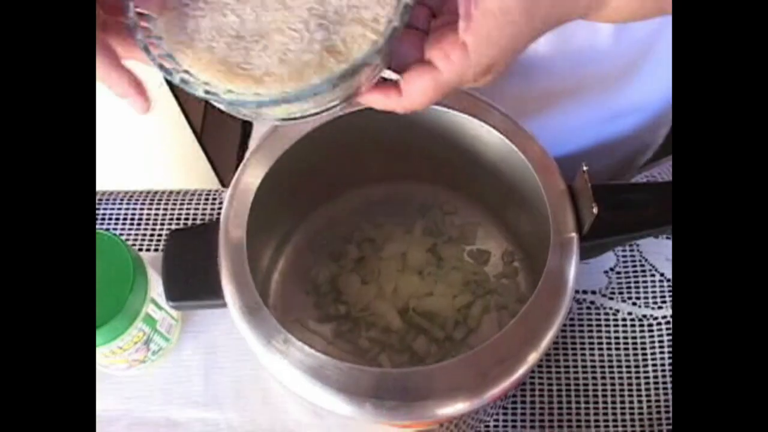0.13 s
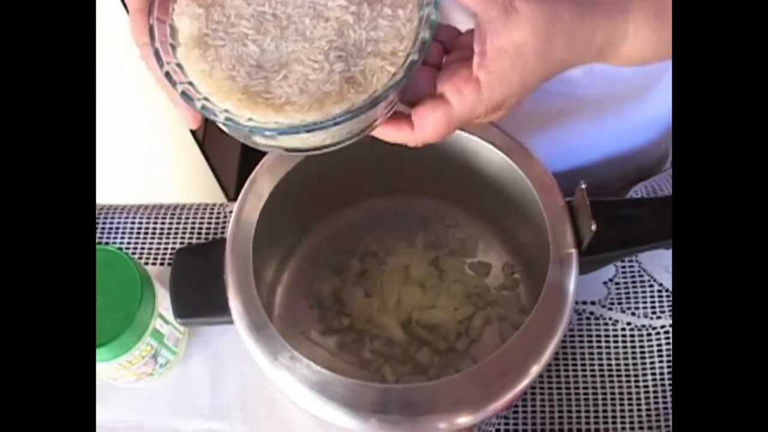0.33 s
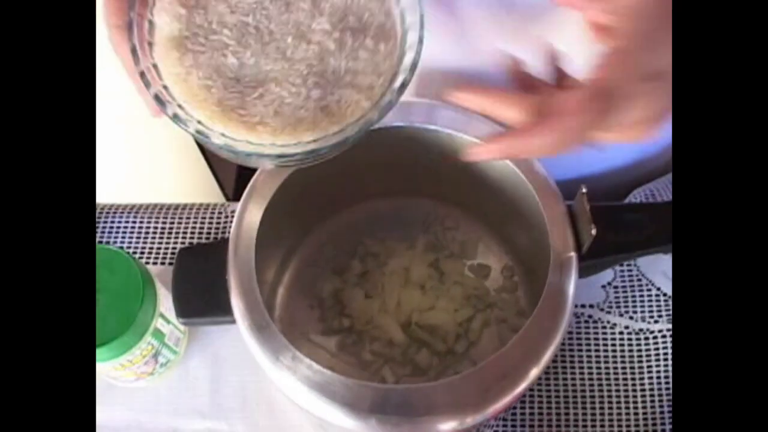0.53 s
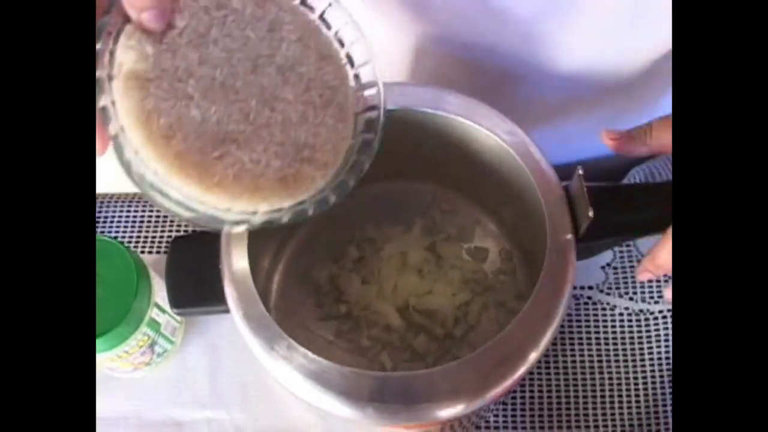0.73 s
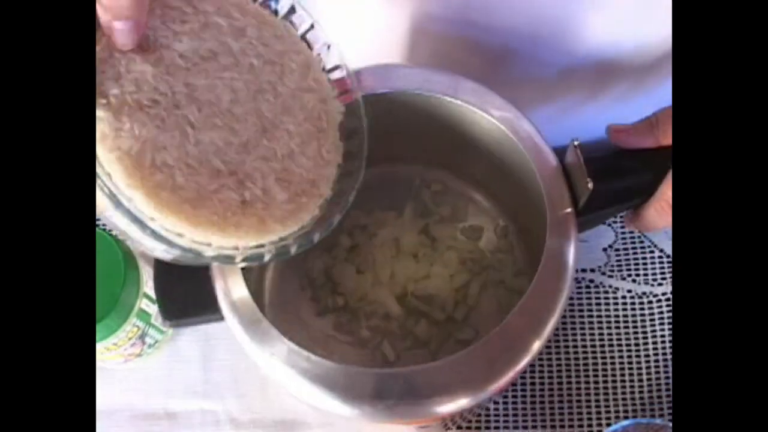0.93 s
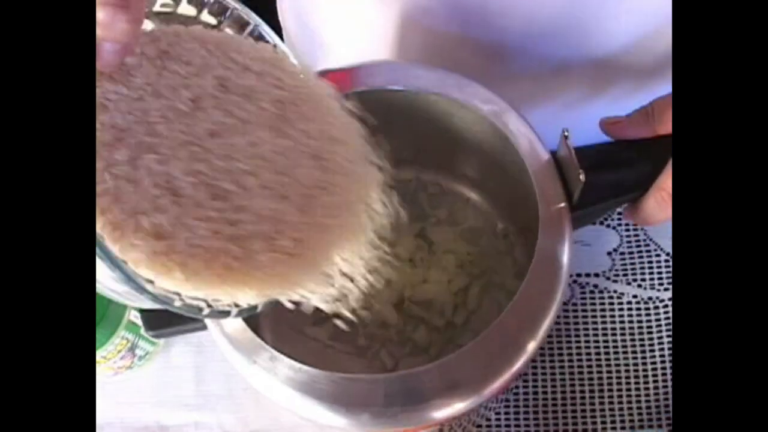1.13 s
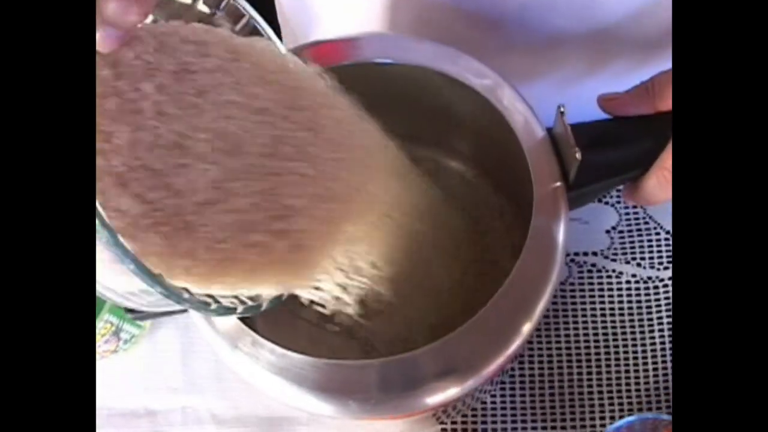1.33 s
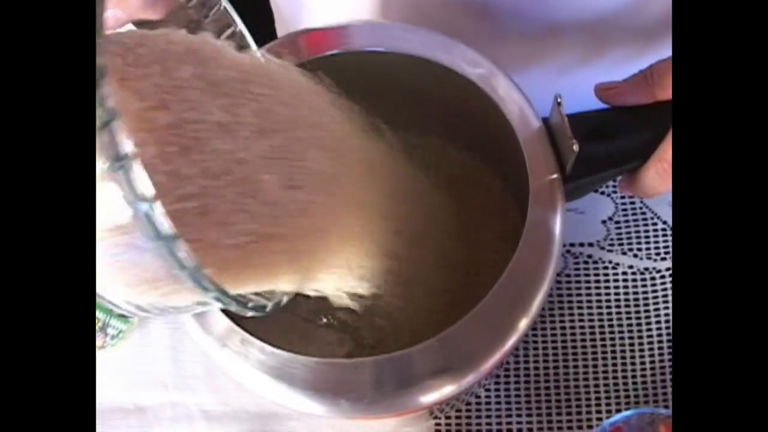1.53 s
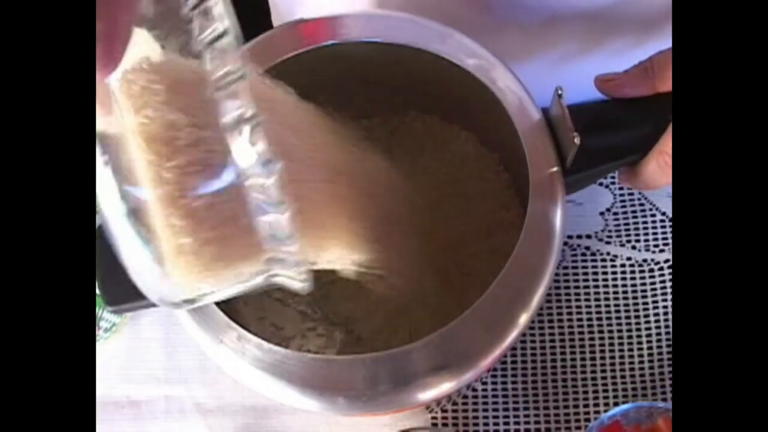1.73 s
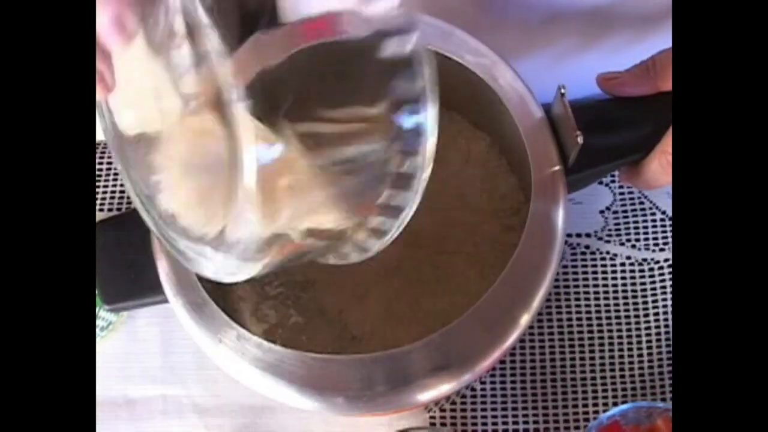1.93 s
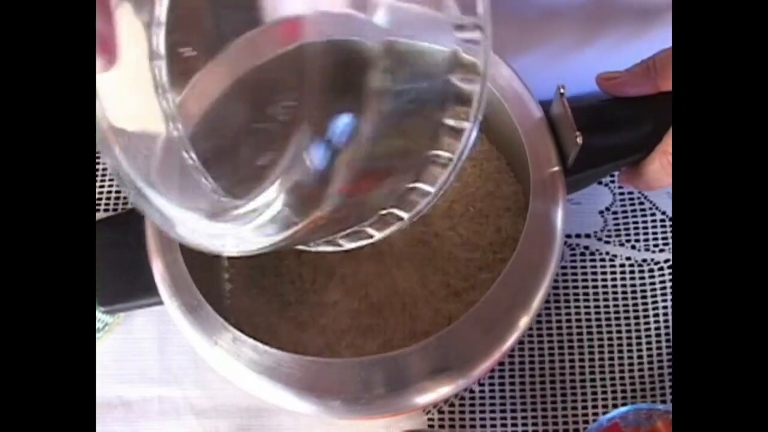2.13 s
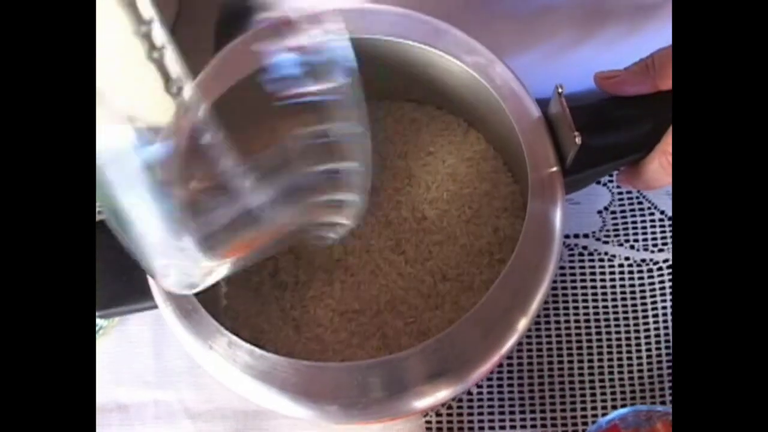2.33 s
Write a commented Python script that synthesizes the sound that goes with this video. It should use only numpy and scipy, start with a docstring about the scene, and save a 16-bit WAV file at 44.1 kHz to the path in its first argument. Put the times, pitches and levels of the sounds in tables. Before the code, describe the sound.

Dry rice pours into a metal pot with a hissing rattle after one ringing knock.

```python
"""A knock rings briefly on a metal pot, then rice slides out of a tilted glass bowl and rattles in.
The sliding grains make the glass sing faintly. The first lump lands with a thud; then thousands of
tiny hits rattle the pot in a few surges, fading and ringing less as the heap grows.
The small kitchen echoes the knock and the thud. Room rumble and soft rustles lie below."""
import sys
import numpy as np
from scipy import signal
from scipy.fft import rfft, irfft, next_fast_len
from scipy.io import wavfile

SR = 44100
rng = np.random.default_rng(int(sys.argv[2]) if len(sys.argv) > 2 else 0)


def wav_record(signal):
    """Record a signal, one row per channel, as 16-bit PCM in the file named by sys.argv[1]."""
    frames = np.transpose(np.atleast_2d(signal))
    bounded = np.clip(frames, -1, 1)
    # unit amplitude maps onto the largest positive 16-bit level
    quanta = np.round(bounded * 32767).astype(np.int16)
    wavfile.write(sys.argv[1], SR, quanta)


N = 105399
TIME = np.arange(N) / SR
PADDED = next_fast_len(N)
FREQS_HZ = np.maximum(np.fft.rfftfreq(PADDED, 1 / SR), 10)
BACKGROUND_TOP_HZ = 12600


def pouring_rice():
    """Grains hit the bare metal, later the heap; the pot's wall rings and the air inside hums."""
    # Loudness of the rattle and of the hum. Each row: time in seconds, level in dB.
    flow = [(1.299, -37), (1.3005, -22.5), (1.306, -25), (1.309, -34), (1.311, -22.5), (1.323, -26),
            (1.325, -21.5), (1.345, -20), (1.35, -24), (1.365, -17), (1.376, -23), (1.385, -18.5),
            (1.432, -19.5), (1.642, -25.5), (2.02, -29), (2.06, -32.5), (2.17, -35), (2.245, -40.5),
            (2.26, -44.5), (2.39, -54)]
    hum_curve = [(1.44, -54), (1.48, -44), (1.55, -43), (1.615, -39), (1.67, -53), (1.71, -64)]
    # Tone of grains on metal and on other grains. Each row: frequency in Hz, level in dB.
    on_metal = [(150, -50), (250, -14.5), (364, -19), (471, -29), (1090, -8.5), (1430, -11.5), (1620, -6.5),
                (1990, -8.5), (5010, -1.5), (9280, -6.5), (15000, -23)]
    on_heap = [(150, -13), (250, -7.5), (287, -42), (346, -10.5), (699, -13.5), (1020, -7.5), (1860, -9.5),
               (3000, -3), (7820, -1), (10800, -9), (15000, -21.5)]
    # The wall's notes. Each row: pitch in Hz, width in Hz, level in dB when bare, and when covered.
    wall_notes = [(790, 54, 0, -5.5), (1065, 19.5, 3.5, -7), (1035, 31, -18, -6), (1650, 67, -2, -13),
                  (1910, 23, -17, -12), (2328, 22, -0.5, -7), (2676, 86, 3.5, -10), (3120, 94, 1, 0.5),
                  (4350, 120, 3, 5), (4580, 67, -1, -3), (4940, 190, 7.5, -3), (5250, 130, -7, 3.5),
                  (6170, 70, -15, -12), (7900, 88, -4, -3), (9160, 860, 6, 4.5)]
    covered = np.interp(TIME, [1.46, 1.73], [0, 1])  # rice covers the pot's floor
    hits = stereo(grains(per_second=20000, spread_db=1.83))
    hits *= from_db(0.77 * drift(rate_hz=42))  # grains come in clumps
    rattle = (1 - covered) * coloured(hits, on_metal, flicker_db=-0.9)
    rattle += covered * coloured(hits, on_heap, flicker_db=0.3)
    wall = 0
    for hz, width_hz, bare_db, covered_db in wall_notes:
        gain = from_db(bare_db + covered * (covered_db - bare_db))
        wall += gain * resonances(hits, [(hz, width_hz, 0)])
    wall *= from_db(-9.5) / np.sqrt(len(wall_notes))
    hum_hz, hum_width_hz = 391, 66
    hum = resonances(hits, [(hum_hz, hum_width_hz, 0)])
    hum = resonances(hum, [(hum_hz, 2 * hum_width_hz, 0)])
    return level(flow) * (rattle + wall) + level(hum_curve) * hum


def sliding_rice():
    """Grains creep over the glass and make it sing faintly."""
    # Loudness of the slide. Each row: time in seconds, level in dB.
    slide_curve = [(1.02, -75), (1.06, -61.5), (1.1, -51), (1.13, -49.5), (1.2, -53.5), (1.25, -52.5),
                   (1.29, -49), (1.3, -60)]
    # Tone of the rubbing. Each row: frequency in Hz, level in dB.
    rub_tone = [(1500, -15), (2500, -5), (5200, -2.5), (8000, -6), (11000, -5), (13500, -12.5)]
    # The bowl's notes. Each row: pitch in Hz, width in Hz, level in dB.
    glass_notes = [(3160, 300, -10), (5235, 160, -0.5), (7940, 220, -8.5)]
    rub = stereo(grains(per_second=15000, spread_db=1.5))
    hiss = coloured(rub, rub_tone, flicker_db=1.0)
    glass_db = np.interp(TIME, [1.16, 1.25], [2, -1])  # it sings less as more grains load it
    return level(slide_curve) * (hiss + from_db(glass_db) * resonances(rub, glass_notes))


def rice_thud():
    """The first lump of rice lands, and the air in the pot gives a short boom."""
    start_s, pitch_hz = 1.294, 417
    age = np.maximum(TIME - start_s, 0)
    return fade(age, db=-20, fade_s=0.04) * np.sin(2 * np.pi * pitch_hz * age)


def pot_knock():
    """A soft and a hard click, heard as one knock, set the pot's notes ringing."""
    # The clicks. Each row: start in seconds, strength in dB, treble limit in Hz (lower is softer).
    blows = [(0.8341, -26, 700), (.8362, -12.5, 9050)]
    # The pot's notes. Each row: pitch in Hz, level in dB, seconds to fade by 60 dB.
    pot_notes = [(110, -9.5, .1), (185.8, -18.5, 0.47), (372, -4, 0.18), (410.3, -9, 0.21), (380, 1.5, .04),
                 (903, -22, 0.33), (1024, -11.5, 0.059), (2191, -19, 0.12), (2794, -18, 0.17),
                 (3035, -5, 0.036), (3173, -12.5, 0.23), (3535, -15.5, 0.34), (3585, -24, 0.37),
                 (4020, -21, .22), (5980, -29, .15), (6700, -29, 0.22), (7900, -20, .06)]
    push, ring = np.full(N, 1e-18), np.zeros(N)
    for start_s, db, soft_hz in blows:
        click = np.full(N, 1e-18)
        click[int(start_s * SR)] = from_db(db)
        push += filtered(click, "low", soft_hz, order=2)
    for hz, db, fade_s in pot_notes:
        decay = from_db(-60 / (fade_s * SR))
        turn = 2 * np.pi * hz / SR
        feedback = [1, -2 * decay * np.cos(turn), decay * decay]
        ring += from_db(db) * signal.lfilter([0, np.sin(turn)], feedback, push)
    return ring


def knock_crack():
    """The knock's noisy snap and its dying tail."""
    # Tone of the snap and of the tail. Each row: frequency in Hz, level in dB.
    snap_tone = [(250, -12), (400, -5), (620, -30), (1040, -10), (1500, -32), (2200, -20), (2500, -31),
                 (3100, -3.5), (4200, -12), (5500, -16.5), (8000, -19), (10000, -27), (13500, -48)]
    tail_tone = [(250, -2), (400, 6), (600, -4.5), (1000, -7), (1500, -13.5), (2200, -14.5), (3200, -16),
                 (5000, -12.5), (8000, -23), (12000, -41)]
    start_s, rise_s = 0.8335, 0.0028
    age = TIME - start_s
    noise = stereo_noise()
    snap = fade(age, db=-11, fade_s=0.054) * coloured(noise, snap_tone, flicker_db=1.1)
    tail = fade(age, db=-30, fade_s=0.57) * coloured(noise, tail_tone, flicker_db=0.5)
    return np.clip(age / rise_s, 0, 1) * (snap + tail)


def kitchen_echo(sound, fade_s=0.38, wall_cut_hz=6700, bass_cut_hz=900):
    """Sound bounces between the walls: six repeating echoes a side, duller on every round."""
    size = next_fast_len(N + SR)
    hz = np.fft.rfftfreq(size, 1 / SR)
    dulling = np.sqrt(1 + (hz / wall_cut_hz) ** 2)
    echoes = []
    for k, delay_s in enumerate(rng.uniform(.012, .035, 12)):
        bounce = from_db(-60 * delay_s / fade_s) / dulling * np.exp(-2j * np.pi * hz * delay_s)
        echoes.append(bounce / (1 - bounce) * (-1) ** (k // 2))  # all its repeats added up
    thinned = rfft(sound, size) * hz ** 2 / (hz ** 2 + bass_cut_hz ** 2)
    return irfft(thinned * [sum(echoes[::2]), sum(echoes[1::2])], size)[:, :N]


def rustles(rise_s=0.0011):
    """Soft rustles and ticks: bursts of noise that start quickly, hold and fade."""
    # Each row: start and hold in seconds, level in dB, low and high edge in Hz, seconds to fade 60 dB.
    bursts = [(0.011, 0.028, -50.5, 2000, 9300, 0.22), (0.077, 0.035, -50, 400, 2500, 0.26),
              (0.356, 0.046, -53.5, 3750, 10700, .12), (.4228, 0.0013, -40, 2500, 8300, 0.022),
              (0.439, 0.02, -49, 300, 2970, 0.18), (.54, 0.09, -60.5, 5000, 9700, .2),
              (0.742, .11, -62, 600, 3000, .2), (2.118, 0.015, -36.5, 248, 1070, 0.28),
              (2.16, 0.031, -40.5, 290, 1620, 0.94), (2.298, .005, -41.5, 2480, 8750, 0.14)]
    out, noise = 0, stereo_noise()
    for start_s, hold_s, db, low_hz, high_hz, fade_s in bursts:
        band = rms_one(filtered(noise, "band", [low_hz, high_hz], order=3))
        age = TIME - start_s
        out += np.clip(age / rise_s, 0, 1) * fade(age - hold_s, db, fade_s) * band
    return filtered(out, "low", BACKGROUND_TOP_HZ, order=8)


def room_tone():
    """The room rumbles and hisses, gently rising and falling."""
    # Loudness before and after the knock. Each row: time in seconds, level in dB.
    early = [(0.0, -44), (0.172, -44), (0.212, -47.5), (0.366, -46.5), (0.38, -44.5), (0.456, -42.5),
             (0.612, -47), (0.69, -48.5), (0.718, -46), (0.8, -42)]
    late = [(1.0, -43.5), (1.25, -45.5), (1.6, -41.5), (2.0, -43), (2.39, -41.5)]
    # Tone of the room. Each row: frequency in Hz, level in dB.
    tone = [(12, -48), (20, -11), (49, -4), (190, -3), (236, -8.5), (546, -8.5), (625, -9.5), (1100, -14.5),
            (1490, -17), (2770, -21.5), (4640, -26), (7560, -31), (13000, -40)]
    rumble = coloured(stereo_noise(), tone, flicker_db=1.5)
    return level(list(early) + list(late)) * filtered(rumble, "low", BACKGROUND_TOP_HZ, order=8)


def deep_rumble():
    """A very deep, wide rumble, opposite on the left and right."""
    deep = filtered(rng.standard_normal(N), "band", hz=[18, 65], order=3)
    return from_db(-51) * rms_one(deep) * np.array([[1], [-1]])


def from_db(db):
    """Turn decibels into a factor to multiply by."""
    return 10 ** (np.asarray(db) / 20)


def rms_one(x):
    """Scale a signal to an average strength (rms) of 1."""
    return x / np.sqrt(np.mean(x ** 2) + 1e-20)


def level(curve):
    """A volume that follows rows of seconds and dB, silent outside them."""
    seconds, db = np.transpose(curve)
    return from_db(np.interp(TIME, seconds, db, -120, -120))


def fade(age, db, fade_s):
    """A volume that stays at db until age 0, then drops 60 dB every fade_s seconds."""
    return from_db(db - 60 * np.maximum(age, 0) / fade_s)


def filtered(x, kind, hz, order):
    """Keep the lows, the highs or a band; a higher order cuts more steeply."""
    return signal.sosfilt(signal.butter(order, hz, kind, fs=SR, output="sos"), x)


def across_pitch(rows):
    """Join rows of Hz and value into a curve over all frequencies."""
    hz, values = np.transpose(rows)
    return np.interp(np.log(FREQS_HZ), np.log(hz), values)


def drift(rate_hz):
    """A smooth random wobble, about 1 in size."""
    step, warm_up = 40, 2000
    memory = np.exp(-2 * np.pi * step * rate_hz / SR)
    noise = rng.standard_normal(N // step + warm_up + 2)
    slow = signal.lfilter([1], [1, -2 * memory, memory * memory], noise)[warm_up:]
    return np.interp(np.arange(N) / step, np.arange(len(slow)), rms_one(slow))


def grains(per_second, spread_db):
    """Two unrelated streams of random clicks, most small and a few large."""
    sizes = from_db(spread_db * np.minimum(rng.exponential(1, (2, N)), 5))
    signs = rng.choice([-1, 1], (2, N))
    return sizes * signs * (rng.random((2, N)) < per_second / SR)


def stereo(pair):
    """Mix two unrelated signals into left and right, less alike towards the treble."""
    # Each row: frequency in Hz, how alike the two sides are (1 means the same).
    likeness = [(60, 0.67), (125, 0.89), (300, 0.88), (600, 0.87), (1000, .8), (2500, 0.45), (12000, 0.38)]
    alike = across_pitch(likeness)
    middle, side = rfft(pair, PADDED) * np.sqrt([1 + alike, 1 - alike])
    return irfft([middle + side, middle - side], PADDED)[:, :N]


def stereo_noise():
    """Plain hiss, partly alike on the left and right."""
    return stereo(rng.standard_normal((2, N)))


def coloured(x, tone, flicker_db):
    """Shape a sound with a tone curve; each half octave flickers on its own. Strength 1."""
    inside = (FREQS_HZ > tone[0][0]) & (FREQS_HZ < tone[-1][0])
    shaped = rfft(x, PADDED) * from_db(across_pitch(tone)) * inside
    out = 0
    for band in range(int(2 * np.log2(tone[0][0] / 10)), 23):
        window = np.clip(1 - np.abs(2 * np.log2(FREQS_HZ / 10) - band), 0, 1)
        flicker = from_db(flicker_db * drift(rate_hz=22.4))
        out += irfft(shaped * window, PADDED)[:, :N] * flicker
    return rms_one(out)


def resonances(x, notes):
    """Let a sound ring a set of notes; narrow ones ring longer. Strength 1."""
    out = 0
    for hz, width_hz, db in notes:
        decay = np.exp(-np.pi * width_hz / SR)
        feedback = [1, -2 * decay * np.cos(2 * np.pi * hz / SR), decay ** 2]
        out += from_db(db) * signal.lfilter([1 - decay ** 2, 0, decay ** 2 - 1], feedback, x)
    return rms_one(out)


def scene():
    """The knock and the rice, with their deep bass cut, over the sounds of the room."""
    impacts = pot_knock() + rice_thud()
    echo = from_db(-9) * kitchen_echo(impacts)
    pot_and_rice = impacts + echo + knock_crack() + pouring_rice() + sliding_rice()
    return filtered(pot_and_rice, "high", hz=106, order=2) + rustles() + room_tone() + deep_rumble()


def record(dry):
    """Cut away the very highest treble."""
    cutoff_hz = 15400
    return signal.sosfilt(signal.cheby2(16, 70, cutoff_hz, fs=SR, output="sos"), dry)


dry = scene()
out = record(dry)
wav_record(out)
```